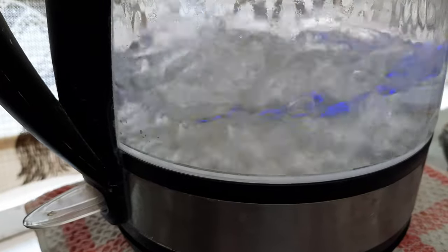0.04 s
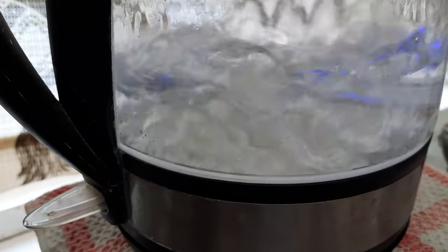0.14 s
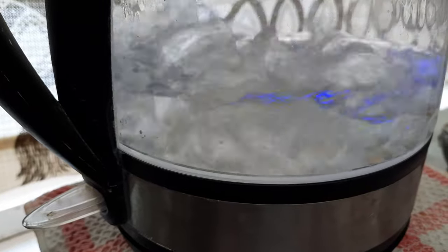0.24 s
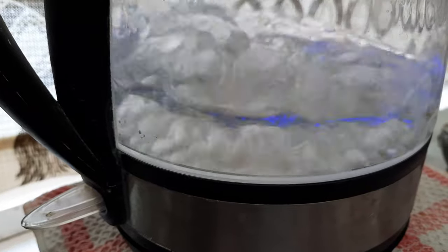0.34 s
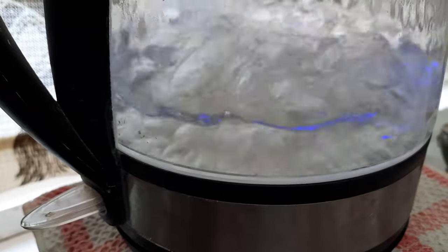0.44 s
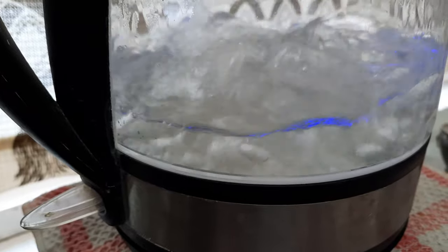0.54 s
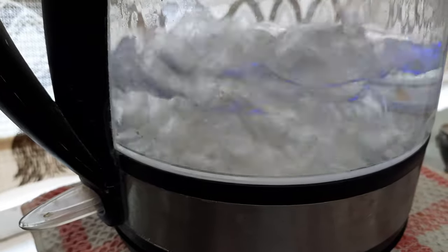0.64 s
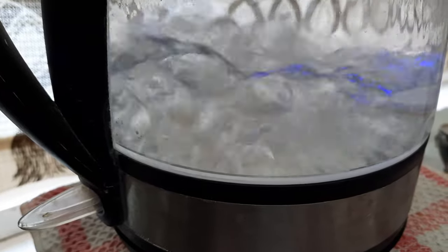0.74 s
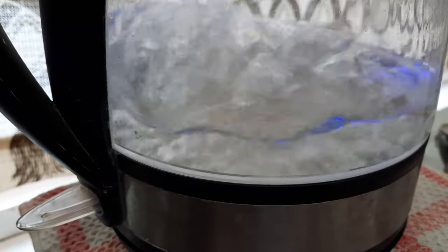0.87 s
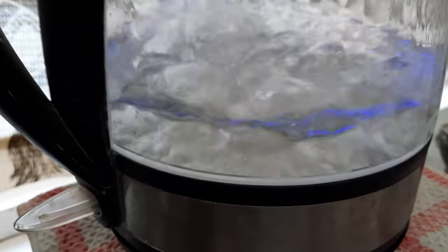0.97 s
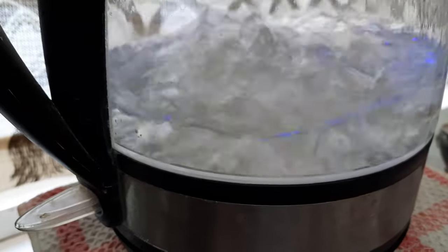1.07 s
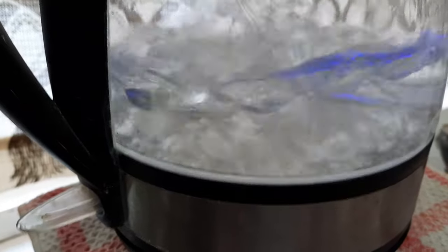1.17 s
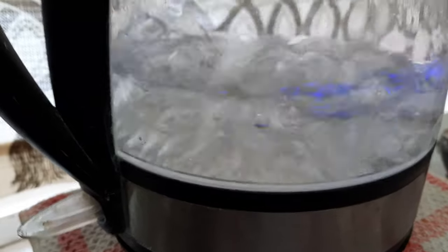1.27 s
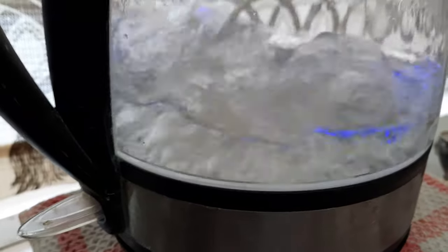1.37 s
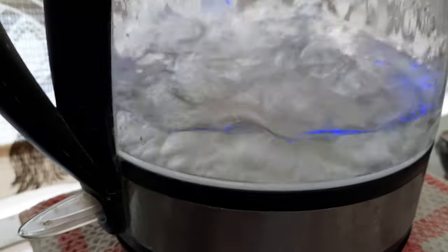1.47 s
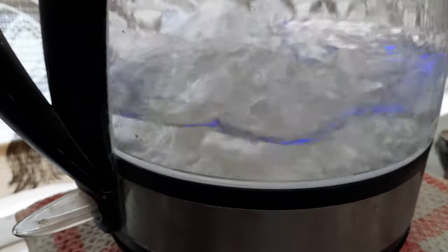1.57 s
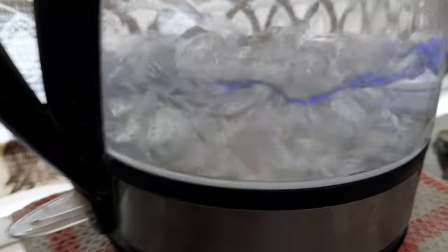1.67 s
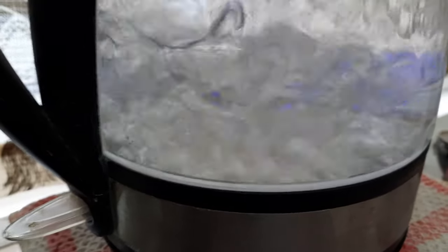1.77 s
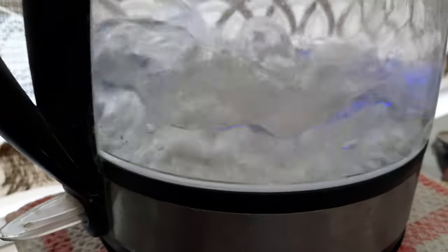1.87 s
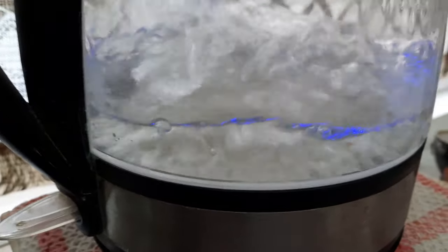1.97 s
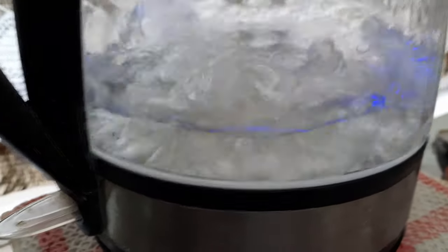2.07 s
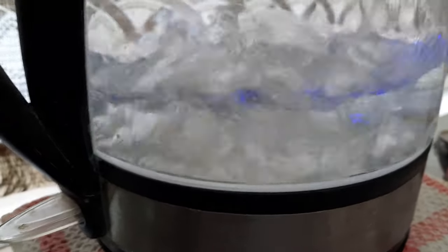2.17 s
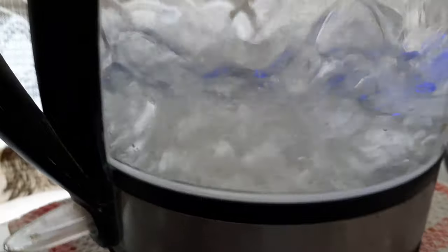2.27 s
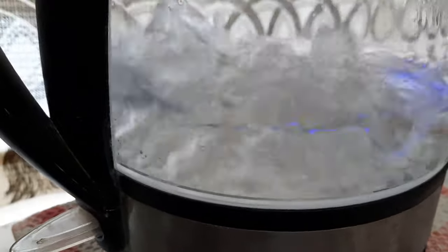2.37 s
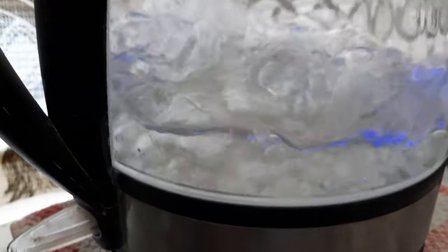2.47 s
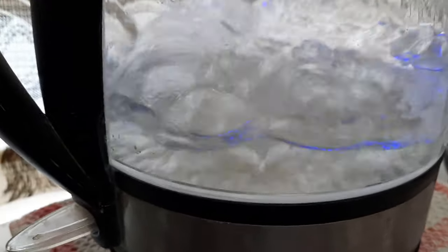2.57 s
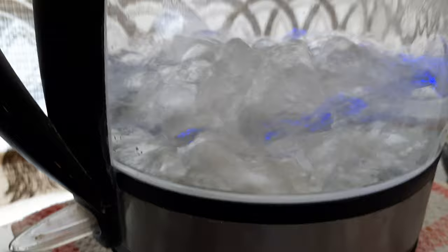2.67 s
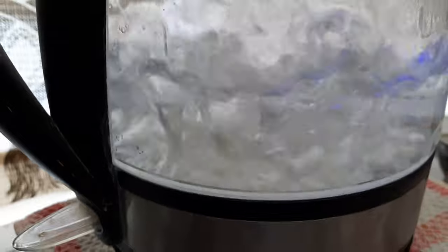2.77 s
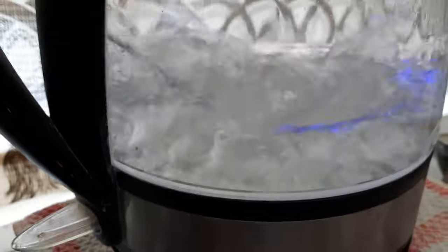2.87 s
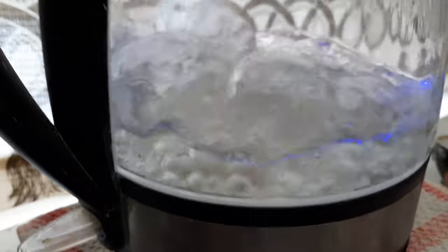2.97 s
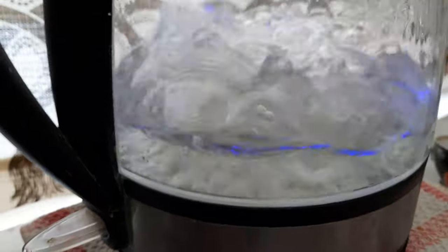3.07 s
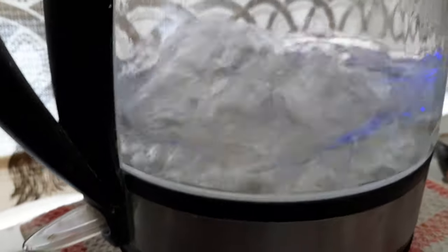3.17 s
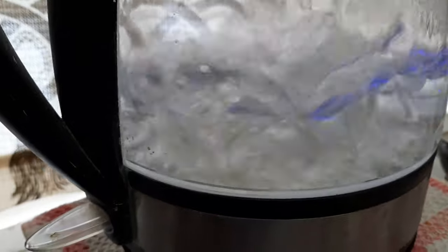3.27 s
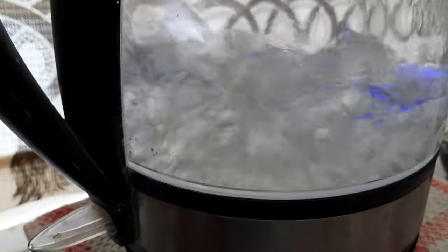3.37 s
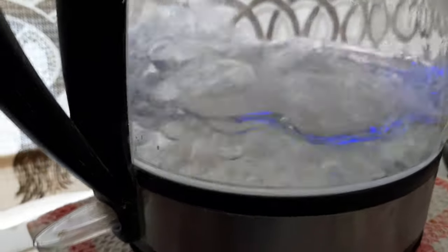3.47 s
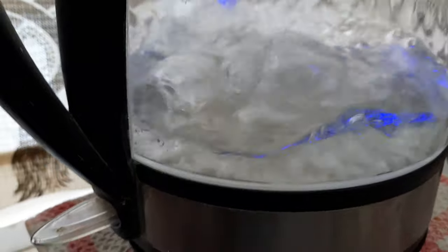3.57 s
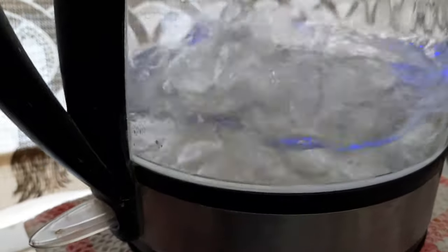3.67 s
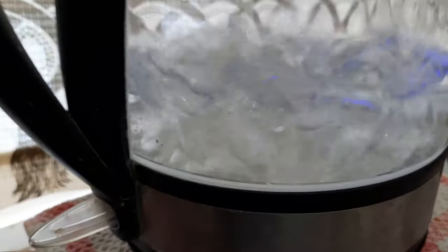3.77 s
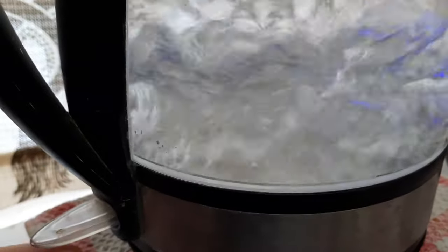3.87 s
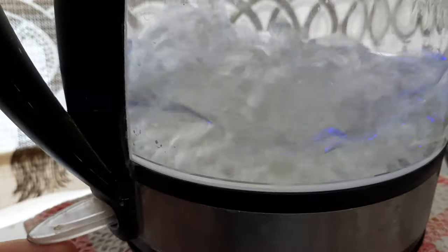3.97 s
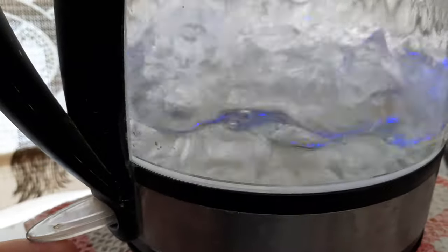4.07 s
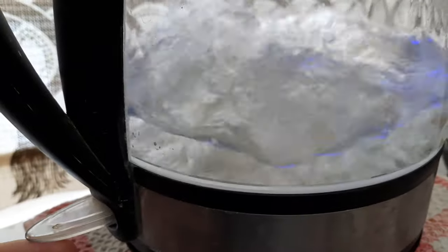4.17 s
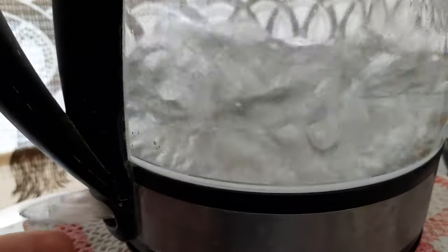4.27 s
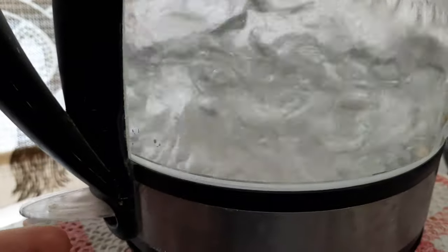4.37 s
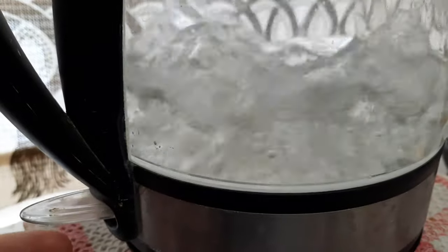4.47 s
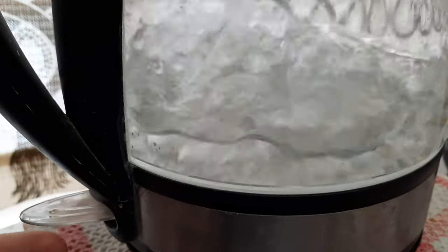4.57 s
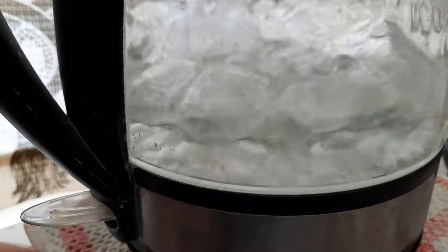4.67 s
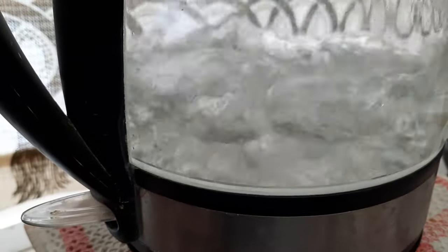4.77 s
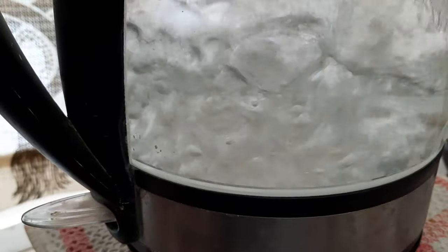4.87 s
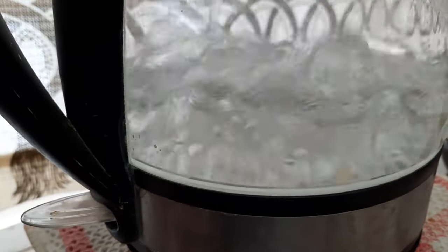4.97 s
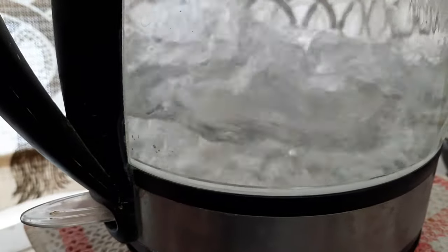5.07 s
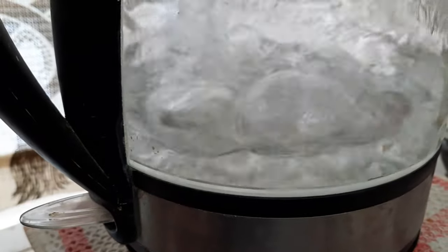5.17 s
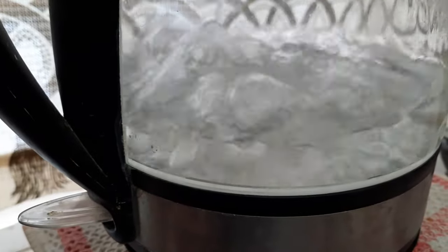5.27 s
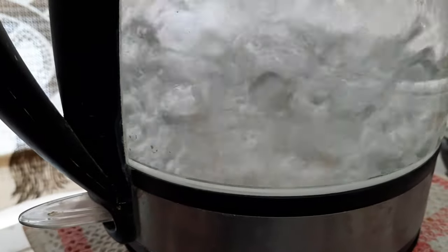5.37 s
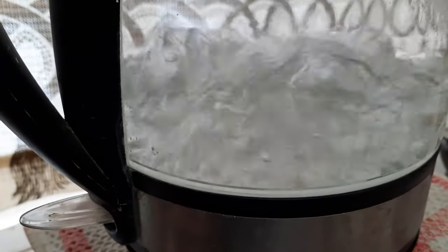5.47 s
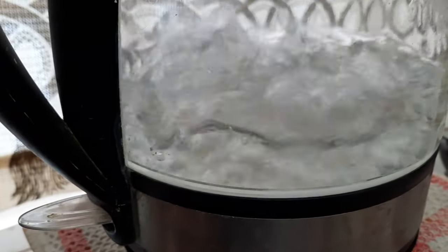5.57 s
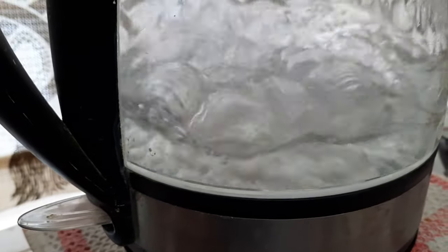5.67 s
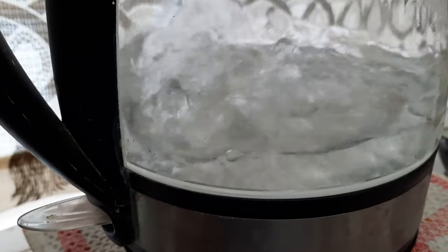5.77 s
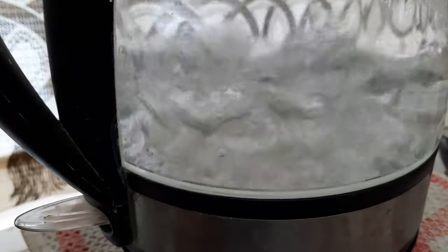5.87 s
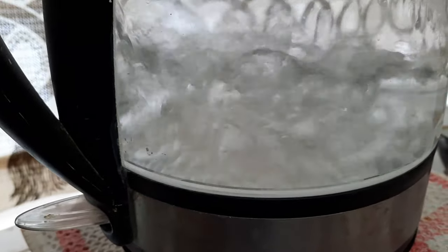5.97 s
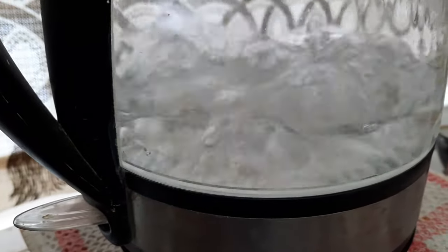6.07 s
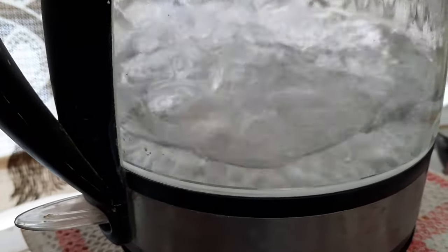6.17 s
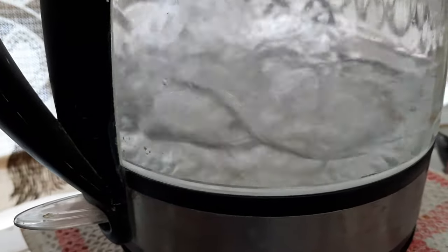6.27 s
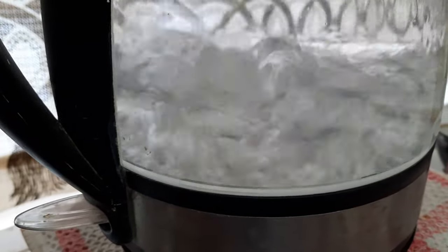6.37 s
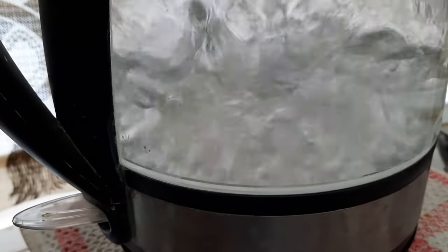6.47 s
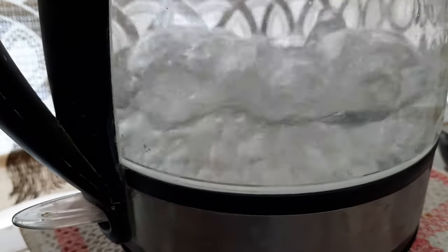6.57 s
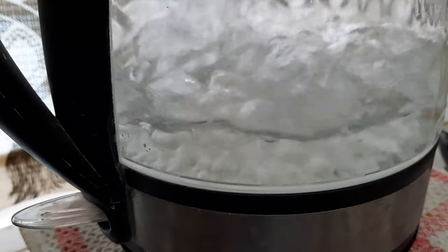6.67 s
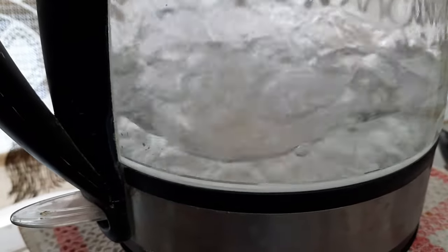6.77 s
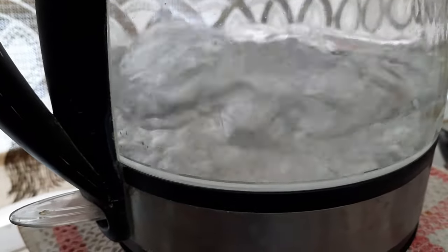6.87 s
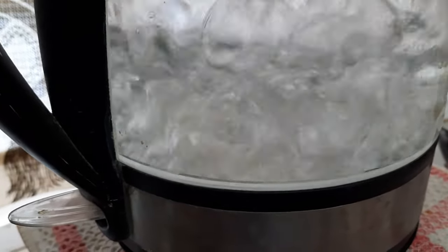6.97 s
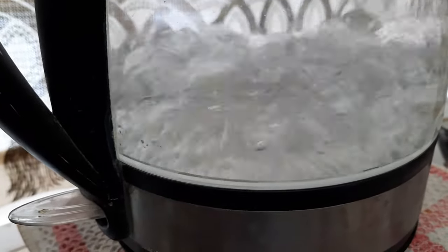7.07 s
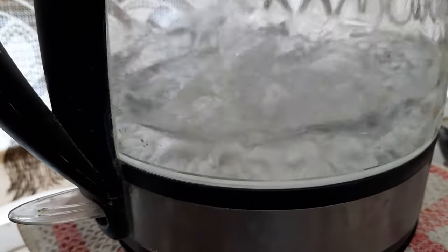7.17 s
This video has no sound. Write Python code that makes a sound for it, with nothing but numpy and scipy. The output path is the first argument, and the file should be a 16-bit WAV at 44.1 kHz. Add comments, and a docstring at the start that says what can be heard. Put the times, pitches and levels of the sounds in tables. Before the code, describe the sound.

Vigorous boiling water in a kettle, heard from very near in a small kitchen with a short room echo. Deep uneven gurgling thumps lie under bright little splashes, spitting droplets and soft hiss. One very short sharp snap comes first on the right, later a loud plastic switch clack with a brief rattle. Boiling carries on to the end, its lowest churning slightly softer.

```python
"""A kitchen table, close by: water at a rolling boil in a glass electric kettle.
Collapsing steam bubbles excite the resonant water-filled body, which booms; the surface heaves about four times
a second, and tearing films and bursting domes ring the air under the lid amid plops, spits and filtered-noise hiss.
One drop snaps sharply on the right. The low churning starts to ease, and about a second later the switch clacks,
a volley of noise bursts with ringing housing modes, while the water boils on."""
import sys
import numpy as np
from scipy import signal
from scipy.fft import rfft, irfft, next_fast_len
from scipy.io import wavfile
from scipy.ndimage import uniform_filter1d, map_coordinates

SR = 44100
rng = np.random.default_rng(int(sys.argv[2]) if len(sys.argv) > 2 else 0)


def transcribe(u):
    """Save the signal u as a 16-bit wav file named by the first command-line argument.

    u: samples, shape (n,) or (channels, n), limited to [-1, 1]; the rate is SR.
    q: integer samples, one column per channel.
    """
    v = np.clip(np.atleast_2d(u).T, -1, 1)
    q = np.round(v * 32767).astype(np.int16)
    wavfile.write(sys.argv[1], SR, q)


N = 318843

# Strength of the boil. Each row: time in seconds, relative level in dB.
BOIL_STRENGTH = [(0.0, -31.5), (0.45, -34), (0.82, -32), (1.05, -35), (1.2, -32), (1.98, -33.5),
                 (2.28, -30), (2.55, -33.5), (3.3, -30), (3.6, -33.5), (4.2, -31), (4.4, -34),
                 (4.92, -33.5), (5.1, -34.5), (5.6, -34), (6.0, -34.5), (6.3, -32), (7.22, -34)]
# Strength of the steam and fine spray. Each row: time in seconds, relative level in dB.
STEAM_STRENGTH = [(0.0, -57.5), (0.4, -57.5), (1.2, -59.5), (1.6, -59), (1.85, -60.5), (2.1, -59),
                  (2.4, -58.5), (3.12, -61), (3.35, -57), (3.6, -60.5), (4.2, -59), (4.62, -64),
                  (4.87, -60.5), (5.5, -63.5), (5.78, -58), (6.1, -61), (6.3, -58.5), (6.55, -63),
                  (6.95, -58.5), (7.23, -62)]
# The biggest domes bursting. Each row: start in seconds, relative peak level in dB, nominal frequency in Hz.
DOME_BURSTS = [(0.3822, -41.5, 2970), (0.466, -49.5, 1860), (0.554, -51.5, 2850), (0.7028, -39.5, 1880),
               (0.7225, -40, 1900), (0.8933, -41.5, 1950), (0.913, -44, 1880), (1.069, -40.5, 1793),
               (1.082, -48, 1950), (1.124, -48.5, 1830), (1.228, -44.5, 1840), (1.242, -45.5, 1950),
               (1.501, -49, 1930), (1.539, -52, 2800), (1.586, -39.5, 1940), (1.675, -49, 1920),
               (1.711, -44.5, 1800), (1.783, -45, 1690), (1.785, -52, 2870), (1.815, -38, 1816),
               (1.867, -40, 1900), (2.055, -50, 1700), (2.182, -44.5, 1940), (2.41, -42.5, 1950),
               (2.481, -48.5, 2010), (2.619, -55, 1650), (2.64, -38.5, 1645), (2.714, -50, 1850),
               (2.812, -41, 1760), (2.876, -46, 1790), (3.029, -44, 2840), (3.199, -37, 2010),
               (3.204, -50, 2900), (3.3685, -41.5, 1730), (3.373, -42, 2820), (3.387, -45.5, 1880),
               (3.414, -46, 1770), (3.519, -43, 1965), (4.003, -44, 1740), (4.037, -48, 1980),
               (4.054, -55, 1720), (4.202, -49, 2820), (4.282, -36.5, 1910), (4.397, -44.5, 2730),
               (4.452, -46, 1580), (4.4784, -42.5, 1760), (4.683, -49.5, 1820), (4.972, -50, 1750),
               (5.119, -43.5, 1830), (5.364, -49.5, 2840), (5.432, -48, 1800), (6.0106, -41.5, 1880),
               (6.113, -46, 1910), (6.121, -49.5, 2850), (6.254, -46, 1720), (6.274, -46, 1900),
               (6.303, -47.5, 1730), (6.7396, -43, 1984), (6.811, -43.5, 1810), (6.991, -47, 1910),
               (7.111, -48.5, 2816)]
# Resonances of the air space over the water. Each row: frequency in Hz, bandwidth in Hz, relative gain in dB.
AIR_MODES = [(1695, 430, -2), (2000, 190, 0.5), (2820, 89, -2.5)]
# The switch trips, hits its stop, rebounds and rattles to rest.
# Each row: start in seconds, relative level in dB, crack t60 in seconds, brightness in dB per octave.
SWITCH_CONTACTS = [(4.2777, -45, 0.012, 4), (4.2902, -16, 0.016, 0), (4.2943, -14, 0.014, -1.5),
                   (4.2963, -4, 0.012, 0.5), (4.2992, -10.5, 0.012, -2.2), (4.3068, -16.5, 0.011, 3.5),
                   (4.3088, -16.5, 0.016, -1), (4.3395, -27, 0.016, -2), (4.381, -39, 0.016, -6),
                   (4.4095, -40, 0.012, -2.5), (4.417, -42, 0.015, -7)]


def amp(db):
    """Amplitude ratio of a level in decibels."""
    return 10 ** (np.asarray(db) / 20)


def unit(x):
    """Normalisation: x scaled to an rms of 1."""
    return x / np.sqrt(np.mean(x ** 2) + 1e-20)


def along(points, hz):
    """Interpolation of (Hz, value) points on a logarithmic frequency axis."""
    f, v = np.transpose(points)
    return np.interp(np.log(hz + 1), np.log(f + 1), v)


def curves(rows):
    """Linear interpolation in time: one value per sample for each column after the time."""
    s, *cols = np.transpose(rows)
    return [np.interp(np.arange(N) / SR, s, c) for c in cols]


def wobble(rate):
    """Slow random modulation: a smooth curve through Gaussian knots, rate of them a second."""
    knots = rng.standard_normal(int(N * rate / SR) + 4)
    return map_coordinates(knots, [np.arange(N) * rate / SR])


def add(track, s, sound):
    """Superposition: mix a sound into a track at s seconds."""
    start = round(s * SR)
    track[..., start:start + sound.shape[-1]] += sound[..., :N - start]


def filtered(x, response):
    """Linear filtering: the spectrum of x times a complex response of frequency."""
    n = x.shape[-1]
    m = 2 * next_fast_len(n)
    return irfft(rfft(x, m) * response(np.fft.rfftfreq(m, 1 / SR)), m)[..., :n]


def coloured(x, points):
    """Minimum-phase filtering: x through a causal filter of the given (Hz, dB) shape."""
    def response(hz):
        # folding the cepstrum onto positive time makes the filter causal
        cepstrum = irfft(np.log(amp(along(points, hz))))
        half = len(cepstrum) // 2
        cepstrum[1:half] *= 2
        cepstrum[half + 1:] = 0
        return np.exp(rfft(cepstrum))
    return filtered(x, response)


def pulses(rate, spread_db):
    """Shot noise: random impulses of either sign, rate a second, their levels scattered."""
    fires = rng.random(N) < rate / SR
    size = amp(spread_db * np.clip(rng.standard_normal(N), -2, 2))
    return fires * size * rng.choice([-1, 1], N)


def burst(t60):
    """Exponential decay of a noise burst, independent at each ear."""
    t = np.arange(SR // 4) / SR
    return rng.standard_normal((2, len(t))) * amp(-60 * t / t60)


def blips(rate, low_hz, high_hz, cycles, spread_db, glide):
    """Bubble resonance: a panned crowd, each decaying 60 dB in some cycles and rising in pitch as it surfaces."""
    count = int(rate * N / SR)
    when, size, loud, pan = rng.random((count, 4)).T[:, :, None]
    hz = low_hz * (high_hz / low_hz) ** size
    phase = hz * np.arange(SR // 25) / SR  # in cycles
    age = phase / cycles
    ring = np.sin(2 * np.pi * phase * (1 + glide * age)) * amp(-60 * age) * (1 - np.exp(-phase / 2))
    ring = ring * amp(spread_db * np.minimum(-np.log(loud + 1e-9), 3))
    index = ((when * N).astype(int) + np.arange(SR // 25)).ravel()
    shares = np.cos(np.pi * pan), np.sin(np.pi * pan)
    return unit(np.array([np.bincount(index, (ring * share).ravel(), N)[:N] for share in shares]))


def patchy(x, depth_db, width, span):
    """Time-frequency modulation: gains wander from pitch to pitch and from moment to moment."""
    z = signal.stft(x, nperseg=512)[2]
    field = rng.standard_normal(z.shape[1:])
    for _ in range(2):
        field = uniform_filter1d(field, int(width), 0)
        field = uniform_filter1d(field, int(span), 1)
    return signal.istft(z * amp(depth_db * unit(field)), nperseg=512)[1][..., :N]


def in_kitchen(x, wet_db):
    """Reverberation: x convolved with the short, frequency-dependent decay of table and walls."""
    # Decay of the kitchen. Each row: frequency in Hz, t60 in seconds.
    decay = [(150, 0.59), (1500, 0.2), (6000, 0.33), (15000, 0.094)]
    hz, t, z = signal.stft(rng.standard_normal((2, SR // 2)), SR, nperseg=256)
    tail = signal.istft(z * amp(-60 * t / along(decay, hz)[:, None]), SR, nperseg=256)[1]
    tail = tail / np.linalg.norm(tail[0])
    return x + amp(wet_db) * signal.fftconvolve(np.atleast_2d(x), tail, axes=1)[:, :N]


def churning(db, cross, surge_db):
    """Structure-borne vibration: rolling water shakes kettle and table with a surging rumble that later eases."""
    # The shaken table. Each row: frequency in Hz, filter gain in dB.
    table_gain = [(25, -30), (45, -9), (70, -5), (110, 3), (145, -2.5), (190, 3), (260, -3), (600, -43.5)]
    ease_from_s, ease_db_per_s = 3.2, 1.5
    eased_db = ease_db_per_s * np.maximum(np.arange(N) / SR - ease_from_s, 0)
    pair = coloured(rng.standard_normal((2, N)) * amp(surge_db * wobble(11)), table_gain)
    return amp(db - eased_db) * unit(pair + cross * pair[::-1])


def steam(hiss_db, flutter_db, patchy_db):
    """Turbulent noise: steam hisses in shifting colours; tiny bubbles seethe on the hot plate at first."""
    # Colour of the steam. Each row: frequency in Hz, filter gain in dB.
    hiss_gain = [(450, -12), (720, -6.5), (860, -9.5), (980, -3.5), (1100, -14), (1330, -14), (1550, -8),
                 (1800, -5), (2020, -8.5), (2250, -15), (2550, -10), (2850, -13.5), (3300, -12.5),
                 (4600, -15.5), (6500, -18), (7200, -12.5), (7800, -18.5), (8600, -17.5), (9600, -28.5),
                 (13000, -18.5), (15800, -33)]
    # Tiny bubbles on the hot plate. Each row: frequency in Hz, filter gain in dB.
    seethe_gain = [(2500, -28), (3700, 0), (4050, -5), (4350, 5), (4800, -4), (5400, -1.5), (6500, -14),
                   (9000, -23)]
    seethe_db, seethe_until_s, fade_db_per_s = -67.5, 1.8, 17
    steam_db, = curves(STEAM_STRENGTH)
    flutter = flutter_db * wobble(25)
    hiss = unit(coloured(rng.standard_normal((2, N)), hiss_gain))
    hiss = amp(steam_db + hiss_db + flutter) * hiss
    faded_db = fade_db_per_s * np.maximum(np.arange(N) / SR - seethe_until_s, 0)
    seethe = amp(seethe_db - faded_db) * unit(coloured(rng.standard_normal((2, N)), seethe_gain))
    return patchy(hiss + seethe, patchy_db, width=9, span=16)


def surface_level():
    """Amplitude modulation: the surface level in dB follows the boil and swells with each heave of the water."""
    slosh_hz, crest_s, swing_db = 3.87, 0.088, 1.5
    mean_db, follows = -56, 0.3  # follows: dB gained for each dB of the boil
    boil_db, = curves(BOIL_STRENGTH)
    heave = np.cos(2 * np.pi * slosh_hz * (np.arange(N) / SR - crest_s))
    return mean_db + follows * (boil_db - boil_db.mean()) + swing_db * heave


def plinking(plink_db, crowd_db, t60, glide):
    """Bubble resonance: trapped air rings, a few clear bubbles over many faint ones."""
    # The clearest air bubbles. Each row: start in seconds, relative level in dB, starting frequency in Hz.
    clear_plinks = [(0.92, -37, 4700), (1.453, -39, 4800), (6.698, -31, 2980), (6.79, -30, 3500)]
    steam_db, = curves(STEAM_STRENGTH)
    crowd = blips(rate=60, low_hz=2680, high_hz=7650, cycles=60, spread_db=5.5, glide=.03)
    out = amp(steam_db + crowd_db) * crowd
    t = np.arange(SR // 16) / SR
    attack = 1 - np.exp(-t / 0.00042)
    for s, db, hz in clear_plinks:
        ring = np.sin(2 * np.pi * (hz * t * (1 + glide * t / t60) + rng.random((2, 1)) / 2))
        add(out, s, amp(db + plink_db - 60 * t / t60) * attack * ring)
    return out


def plopping(plop_db, crowd_db, t60, attack_s, glide):
    """Damped oscillation: small pockets of steam break with a hollow plop, clear ones over a faint crowd."""
    # Pockets under the surface. Each row: start in seconds, relative peak level in dB, starting frequency in Hz.
    clear_plops = [(0.064, -44, 870), (1.123, -37, 821), (1.184, -43, 930), (1.266, -44, 934),
                   (1.738, -41, 1033), (1.951, -42, 1065), (2.179, -44, 930), (2.201, -40.5, 882),
                   (2.413, -46, 972), (2.49, -41.5, 970), (2.639, -43, 896), (2.827, -42, 751),
                   (3.365, -38.5, 920), (3.647, -38, 753), (3.891, -41, 968), (3.976, -40, 900),
                   (4.724, -40.5, 810), (4.861, -41, 980), (5.54, -42, 970), (6.288, -38.5, 1060),
                   (6.378, -36.5, 1130), (6.988, -40.5, 1300)]
    crowd = blips(rate=45, low_hz=712, high_hz=1085, cycles=19.5, spread_db=3.5, glide=0.045)
    out = amp(surface_level() + crowd_db) * crowd
    t = np.arange(SR // 16) / SR
    envelope = amp(-60 * t / t60) * (1 - np.exp(-t / attack_s))
    for s, db, hz in clear_plops:
        turns = hz * t * (1 + glide * t / t60) + rng.random((2, 1)) / 4
        plop = np.sin(2 * np.pi * turns) * envelope
        add(out, s, amp(db + plop_db) * plop / np.abs(plop).max())
    return out


def spitting(fizz_db, spit_db, spit_t60, fizz_t60, focus_db, rise_s, patchy_db, mist_db, mist_s):
    """Shot noise: droplets burst in tiny puffs, a continuous fizz and some louder spits."""
    # The loudest droplets. Each row: start in seconds, relative peak level in dB, favoured frequency in Hz.
    loud_spits = [(0.0967, -44.5, 7000), (0.273, -40, 5400), (0.383, -37.5, 3150), (0.403, -45, 3080),
                  (0.7467, -40, 5400), (1.1373, -36, 5800), (1.368, -47, 6000), (1.8206, -39.5, 4400),
                  (1.895, -41, 3430), (1.952, -43, 3420), (1.9914, -43, 3350), (2.377, -43, 3260),
                  (2.435, -43.5, 3370), (2.469, -43, 3040), (2.557, -46, 3770), (2.631, -44, 3460),
                  (2.724, -41.5, 4360), (2.796, -46, 5000), (2.826, -40, 3000), (2.885, -48, 3010),
                  (2.949, -39.5, 3240), (3.673, -46.5, 7390), (3.845, -45, 3090), (3.975, -51, 6140),
                  (3.999, -48, 6910), (4.736, -47, 4270), (4.789, -46.5, 3070), (4.8367, -39.5, 4070),
                  (4.926, -46, 3270), (4.954, -50, 3700), (5.108, -49, 5200), (5.775, -48.5, 5000),
                  (6.378, -37, 4080), (6.486, -46, 4970), (6.6972, -44, 3730), (6.727, -44, 3300),
                  (6.747, -51, 3300), (6.789, -44, 3400), (6.973, -41.5, 3740), (6.988, -45, 3600)]
    # Colour of bursting droplets. Each row: frequency in Hz, filter gain in dB.
    spray_gain = [(600, -13), (1500, -10.5), (3000, 1.5), (5000, -1.5), (8000, -3), (10000, -6.5),
                  (13000, -2.5), (16000, -8)]
    steam_db, = curves(STEAM_STRENGTH)
    t = np.arange(SR // 4) / SR
    swell = 1 - np.exp(-t / rise_s)
    # the puffs add as energies; their root shapes the noise
    puffs = signal.fftconvolve(pulses(rate=210, spread_db=3.2) ** 2, swell ** 2 * amp(-120 * t / fizz_t60))[:N]
    fizz = patchy(np.sqrt(np.abs(puffs)) * rng.standard_normal((2, N)), patchy_db, width=22, span=3)
    out = amp(steam_db + fizz_db) * unit(coloured(fizz, spray_gain))
    for s, db, hz in loud_spits:
        colour = [(f, level - focus_db * abs(np.log2(f / hz))) for f, level in spray_gain]
        mist = np.abs(pulses(rate=500, spread_db=3)[:len(t)]) * np.exp(-t / mist_s)  # finer drops follow it
        spit = coloured(swell * burst(spit_t60) + amp(mist_db) * mist, colour)
        add(out, s, amp(db + spit_db) * spit / np.abs(spit).max())
    return out


def spattering(spatter_db, fall_s, grain_db):
    """Modulated shot noise: drops thrown up by each big dome patter back within hundredths of a second."""
    # Colour of the thrown drops. Each row: frequency in Hz, filter gain in dB.
    spatter_gain = [(500, -16), (950, 0), (1300, -9), (1750, -1), (2000, 1.5), (2300, -6.5), (2850, -0.5),
                    (3300, -13), (5000, -16.5), (12000, -26)]
    shower, t = np.zeros(N), np.arange(SR // 4) / SR
    envelope = (1 - np.exp(-t / 0.0019)) * np.exp(-t / fall_s)
    for s, db, hz in DOME_BURSTS:
        add(shower, s, amp(db) * envelope)
    drops = np.array([pulses(rate=1100, spread_db=grain_db) for ear in range(2)])
    return amp(spatter_db) * shower * unit(coloured(drops, spatter_gain))


def lesser_splashes(surface_db, count):
    """Random excitation of air modes: small domes, harder on the crest of a heave; rows as in DOME_BURSTS."""
    over_surface_db, scatter_db, detune_share = 1, 1.5, 0.05
    when, size, mode, detune = rng.random((count, 4)).T
    hz, _, mode_db = np.array(AIR_MODES)[(mode * len(AIR_MODES)).astype(int)].T
    at = when * (N - 1)
    db = surface_db[at.astype(int)] + over_surface_db + mode_db + scatter_db * (2 * size - 1)
    return list(zip(at / SR, db, hz * (1 + detune_share * (2 * detune - 1))))


def resonance(f, hz, width_hz):
    """Second-order resonance: response at f of a mode at hz with a bandwidth of width_hz."""
    return 1j * f * width_hz / (hz * hz - f * f + 1j * f * width_hz)


def splashing(slosh_db, blip_db, splash_db, splash_t60, width_hz, tear_db, surge_db, film_db, rise_s, glide):
    """Cavity resonance: water films tear in surges, and bursting domes ring the air with a rising plip."""
    surface_db = surface_level()

    def cavity(f):
        # neighbouring modes alternate in sign
        return sum((-1) ** k * amp(db) * resonance(f, hz, width) for k, (hz, width, db) in enumerate(AIR_MODES))

    shared_tearing = pulses(rate=600, spread_db=7.5)
    tearing = shared_tearing + np.array([pulses(rate=650, spread_db=4.5) for ear in range(2)])
    surges = amp(surge_db * np.clip(wobble(28), -2, 1.5))
    slosh = amp(slosh_db) * unit(filtered(tearing * surges, cavity))
    bubbles = amp(blip_db) * blips(rate=55, low_hz=1560, high_hz=2060, cycles=43, spread_db=2.5, glide=0.06)
    out, t = amp(surface_db) * (slosh + bubbles), np.arange(SR // 4) / SR
    swell = 1 - np.exp(-(t / rise_s) ** 2)
    for s, db, hz in DOME_BURSTS + lesser_splashes(surface_db, count=60):
        film = filtered(swell * burst(splash_t60),
                        lambda f: resonance(f, hz, width_hz) + amp(tear_db) * cavity(f))
        turns = hz * t * (1 + glide * (t / splash_t60 - .5)) + rng.random((2, 1)) / 2
        plip = swell * amp(-60 * t / splash_t60) * np.sin(2 * np.pi * turns)
        pop = plip + amp(film_db) * film / np.abs(film).max()
        add(out, s, amp(db + splash_db) * pop / np.abs(pop).max())
    return out


def snap(s, db, t60, left_db, grit):
    """Impulse excitation: one very short dry snap of a drop, close on the right."""
    # Colour of the snapping drop. Each row: frequency in Hz, filter gain in dB.
    snap_gain = [(40, 20), (200, 5), (700, 5), (2000, 1), (3100, -11), (4500, 1), (9000, -11.5),
                 (12000, -14), (15000, 7), (16000, -1.5)]
    out, t = np.zeros((2, N)), np.arange(SR // 4) / SR
    push = coloured(grit * burst(t60) - (t == 0), snap_gain)
    push = push / np.abs(push).max(axis=1, keepdims=True)
    add(out, s, amp(db) * push * amp([[left_db], [0]]))
    return out


def jolt(db, t60):
    """Impact transmission: the hardest contact of the switch jolts the base with a short, dull knock."""
    # The jolted base. Each row: frequency in Hz, filter gain in dB.
    base_gain = [(40, -15), (100, -11), (300, -2), (550, 1), (900, -12), (2000, -29)]
    out = np.zeros((2, N))
    s = max(SWITCH_CONTACTS, key=lambda row: row[1])[0]
    knock = coloured(burst(t60)[0], base_gain)
    add(out, s, amp(db) * knock / np.abs(knock).max())
    return out


def switch(crack_db, ring_db, right_db, shadow_db, shadow_hz, tail_db, tail_t60, tail_delay_s, tail_top_hz,
           rattle, rise_s):
    """Impact and modal ringing: each lever contact cracks, rings the loose housing and scatters into a dull tail."""
    # Modes of lever and housing. Each row: frequency in Hz, relative level in dB, t60 in seconds.
    housing_modes = [(983, -1, 0.15), (1250, -5, 0.09), (1380, -5, 0.15), (1440, 5, 0.12), (1539, 1, 0.16),
                     (1633, -2.5, 0.18), (2270, -5.5, 0.12), (2730, -4, 0.14), (3239, -5, 0.15),
                     (4392, -4.5, 0.15), (5560, -5, 0.13), (6858, -2, 0.12), (8440, 1, 0.092),
                     (8780, 0, 0.13)]
    # Colour of a contact. Each row: frequency in Hz, filter gain in dB.
    crack_gain = [(30, -21), (100, 3), (450, -3), (700, -5), (880, -2), (1000, 4), (1130, -6), (1300, 4.5),
                  (1650, 7), (1850, 0), (2300, -0.5), (3100, -0.5), (3700, -7), (4400, -2), (5100, -5.5),
                  (5500, -1), (6100, -5.5), (6800, -4), (7500, -7), (8600, -3), (10200, -2), (11000, -8),
                  (12500, -13), (13900, -9.5), (14700, 0), (16000, -13)]
    out, t = np.zeros((2, N)), np.arange(SR // 4) / SR

    def drift(hz):
        # random phase walk, in cycles: high modes blur most
        steps = rng.standard_normal((2, len(t)))
        return rng.random((2, 1)) + rattle * np.sqrt(hz / SR) * np.cumsum(steps, axis=1)

    def shadow(hz):
        # the kettle shades the right ear around shadow_hz
        bump = np.exp(-(2 * np.log2((hz + 1) / shadow_hz)) ** 2)
        return amp(shadow_db * bump * np.array([[-.5], [.5]]))

    for s, db, crack_t60, bright in SWITCH_CONTACTS:
        colour = [(hz, level + bright * np.log2(max(hz, 800) / 3000)) for hz, level in crack_gain]
        crack = filtered(burst(crack_t60) * (1 - np.exp(-t / rise_s)), shadow)
        ring = sum(amp(level - 60 * t / t60) * np.sin(2 * np.pi * (hz * t + drift(hz)))
                   for hz, level, t60 in housing_modes)
        tail = amp(tail_db) * burst(tail_t60) * (1 - np.exp(-t / tail_delay_s))
        tail = filtered(tail, lambda hz: 1 / (1 + 1j * hz / tail_top_hz))
        add(out, s, amp(db) * (amp(crack_db) * coloured(crack + tail, colour) + amp(ring_db) * ring))
    return out * amp([[0], [right_db]])


def gulping(gulp_db, t60, attack_s, glide):
    """Damped bubble oscillation: middling bubbles pinch off with a short gulp that rises in pitch."""
    # Bubbles pinching off. Each row: start in seconds, relative peak level in dB, starting frequency in Hz.
    gulps = [(0.058, -44, 523), (0.548, -37, 490), (0.7, -31, 454), (1.123, -38.5, 523),
             (1.292, -31.5, 460), (1.585, -32, 443), (1.766, -31, 424), (1.815, -28.5, 470),
             (1.922, -33.5, 440), (2.014, -51, 452), (2.389, -27, 455), (2.49, -33, 470), (2.858, -37, 476),
             (3.061, -48, 476), (3.186, -33, 470), (3.276, -46, 460), (3.616, -44, 476), (3.875, -38, 510),
             (3.969, -44, 440), (4.222, -36, 546), (4.256, -50, 560), (4.434, -42, 443), (4.665, -49, 490),
             (4.723, -35, 460), (5.174, -35.5, 487), (5.418, -33, 468), (5.518, -37, 495),
             (5.852, -31, 450), (6.262, -33, 467), (6.44, -42, 456)]
    out, t = np.zeros(N), np.arange(SR // 16) / SR
    envelope = amp(-60 * t / t60) * (1 - np.exp(-t / attack_s))
    for s, db, hz in gulps:
        gulp = np.sin(2 * np.pi * hz * t * (1 + glide * t / t60)) * envelope
        add(out, s, amp(db + gulp_db) * gulp / np.abs(gulp).max())
    return out


def rumble(bed_db, thump_db, boom_t60, knock_db, gurgle_db, collapse_s, lumps_db):
    """Impulsive excitation of a resonator: collapsing bubbles boom, big ones over a lumpy bed of small ones."""
    # The biggest bubbles collapsing. Each row: start in seconds, relative peak level in dB, boom frequency in Hz.
    thumps = [(0.089, -29, 320), (0.132, -25.5, 288), (0.281, -24.5, 326), (0.352, -18.5, 323),
              (0.413, -22.5, 336), (0.432, -21.5, 341), (0.489, -23.5, 349), (0.55, -23, 370),
              (0.691, -27.5, 360), (0.864, -19.5, 333), (0.892, -17.5, 334), (0.922, -32, 344),
              (1.022, -36, 370), (1.136, -21.5, 320), (1.208, -24, 332), (1.291, -32, 306),
              (1.339, -27, 386), (1.407, -20.5, 327), (1.435, -21, 340), (1.566, -24, 372),
              (1.684, -19, 333), (1.816, -15, 320), (1.908, -25.5, 362), (1.959, -26.5, 330),
              (2.015, -25, 316), (2.181, -21, 317), (2.224, -23, 322), (2.267, -26, 335), (2.39, -19, 378),
              (2.557, -22.5, 337), (2.692, -18.5, 350), (2.827, -29, 337), (2.874, -24.5, 361),
              (2.97, -19, 368), (3.061, -18.5, 359), (3.106, -27, 360), (3.201, -19.5, 335),
              (3.277, -17.5, 326), (3.613, -26.5, 303), (3.715, -19, 333.6), (3.937, -31, 343),
              (4.153, -31, 333), (4.206, -24, 337), (4.384, -22, 370), (4.434, -20.5, 317),
              (4.57, -22.5, 328), (4.651, -22, 337), (4.789, -28, 322), (4.835, -21, 323),
              (4.909, -22.5, 329), (5.186, -18, 335), (5.32, -23.5, 318), (5.52, -23.5, 304),
              (5.57, -21.5, 333), (5.613, -25.5, 333), (5.716, -22, 330), (5.846, -21.5, 345),
              (6.028, -22.5, 321), (6.261, -19.5, 342), (6.324, -25.5, 387), (6.355, -21, 333),
              (6.497, -34, 294), (6.844, -21.5, 332), (6.905, -22.5, 323)]
    # The water-filled body. Each row: frequency in Hz, filter gain in dB.
    body_gain = [(25, -26), (45, -34), (70, -39), (110, -21), (190, -13), (245, -14.5), (298, -3.5),
                 (328, 4), (358, -2.5), (430, -7), (590, -20.5), (690, -30), (860, -32.5), (980, -32),
                 (1200, -39.5), (2500, -70)]
    boil_db, = curves(BOIL_STRENGTH)
    lumps = amp(lumps_db * np.clip(wobble(22), -2, 1.5))
    bed = amp(bed_db) * unit(coloured(lumps * pulses(rate=900, spread_db=3), body_gain))
    gurgle = blips(rate=85, low_hz=380, high_hz=623, cycles=12.3, spread_db=4.0, glide=0.023)[0]
    big, t = np.zeros(N), np.arange(SR // 8) / SR
    knock = coloured(1. * (t == 0), body_gain)
    knock = amp(knock_db) * knock / np.abs(knock).max()
    swell = 1 - np.exp(-(t / collapse_s) ** 2)  # a big bubble takes a moment to cave in
    for s, db, hz in thumps:
        boom = swell * np.sin(2 * np.pi * hz * t) * amp(-60 * t / boom_t60)
        thump = knock + boom
        add(big, s, amp(db + thump_db) * thump / np.abs(thump).max())
    return amp(boil_db) * (bed + amp(gurgle_db) * gurgle) + big


def scene():
    """Superposition with an interaural delay: the kettle's boom reaches the left ear a moment early."""
    # Balance of the ears for the water. Each row: frequency in Hz, left minus right in dB.
    tilt = [(60, 4), (130, -5.5), (190, 5.5), (245, -2.5), (295, -6.5), (345, -1.5), (420, -1), (620, 9.5),
            (750, -2), (1000, 4.5), (1900, 0), (3700, 3), (7000, 0.5), (9700, 4.5), (14000, 0)]
    lead_s = 0.00017
    boom = rumble(bed_db=-4.0, thump_db=-2.5, boom_t60=0.11, knock_db=-2.0, gurgle_db=-17.5,
                  collapse_s=0.0028, lumps_db=1.13)
    boom = boom + gulping(gulp_db=3.5, t60=0.036, attack_s=0.00063, glide=0.028)
    boom = in_kitchen(boom, wet_db=-17)
    boom = filtered(boom, lambda hz: np.exp(1j * np.pi * hz * lead_s * np.array([[1], [-1]])))
    top = splashing(slosh_db=-8.5, blip_db=-7.5, splash_db=5.0, splash_t60=0.042, width_hz=175,
                    tear_db=-10.0, surge_db=7.5, film_db=-1.5, rise_s=0.0013, glide=0.07)
    top = top + plinking(plink_db=-3.5, crowd_db=-12.5, t60=0.016, glide=0.046)
    top = top + spitting(fizz_db=-3, spit_db=5.5, spit_t60=0.021, fizz_t60=0.018, focus_db=7.0,
                         rise_s=0.00087, patchy_db=2.0, mist_db=-3, mist_s=0.016)
    top = top + spattering(spatter_db=-10, fall_s=0.02, grain_db=5)
    top = top + plopping(plop_db=-1.5, crowd_db=-8, t60=0.017, attack_s=0.00025, glide=0.047)
    water = boom + in_kitchen(top, wet_db=-8.5)
    water = water + steam(hiss_db=-1.1, flutter_db=2.3, patchy_db=2.6)
    water = water + churning(db=-50.0, cross=0.5, surge_db=1.0)
    water = filtered(water, lambda hz: amp(along(tilt, hz) * np.array([[.5], [-.5]])))
    clack = switch(crack_db=3.0, ring_db=-27.0, right_db=-0.5, shadow_db=-10.5, shadow_hz=8800,
                   tail_db=-17.5, tail_t60=0.2, tail_delay_s=0.0074, tail_top_hz=10500,
                   rattle=0.006, rise_s=0.00035)
    tick = snap(s=1.3536, db=-6.0, t60=0.0018, left_db=-25, grit=0.2)
    return water + clack + jolt(db=-25, t60=0.032) + tick


def record(dry):
    """Band limitation: the microphone loses the deepest bass and falls off steeply at the upper limit."""
    bass_hz, top_hz = 45, 16100

    def response(hz):
        bass = hz ** 2 / np.sqrt(hz ** 4 + bass_hz ** 4)
        return bass / (1 + (hz / top_hz) ** 130)
    return filtered(dry, response)


dry = scene()
out = record(dry)
transcribe(out)
```